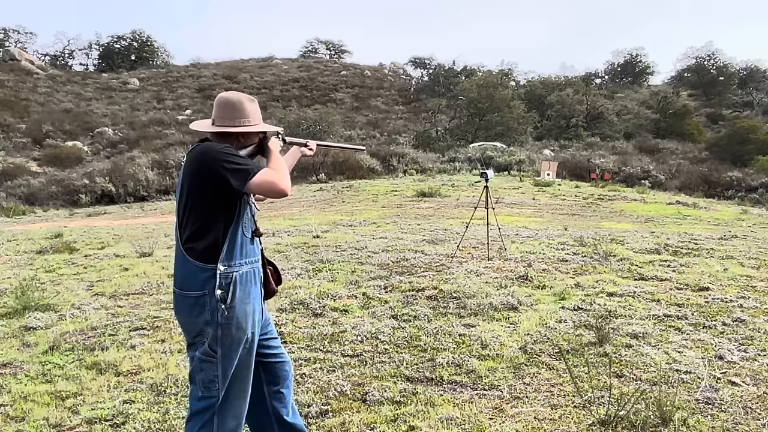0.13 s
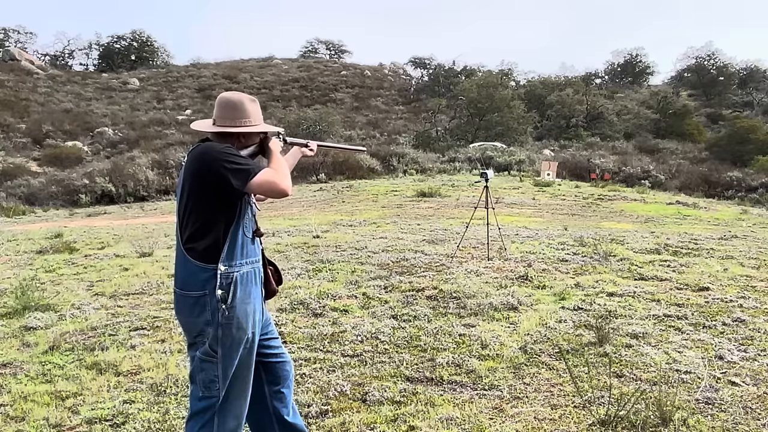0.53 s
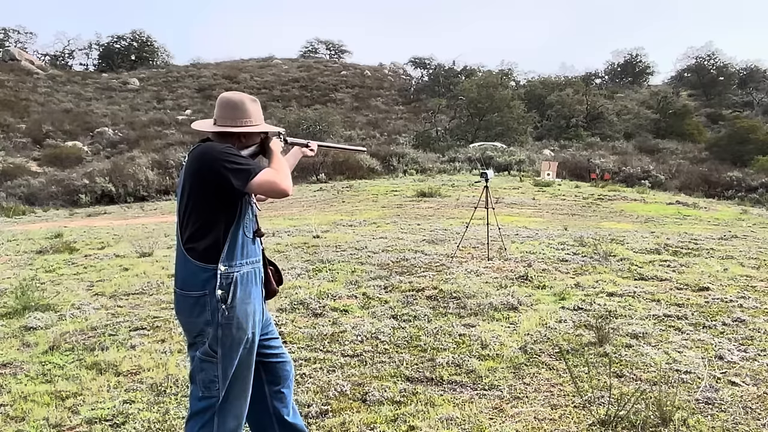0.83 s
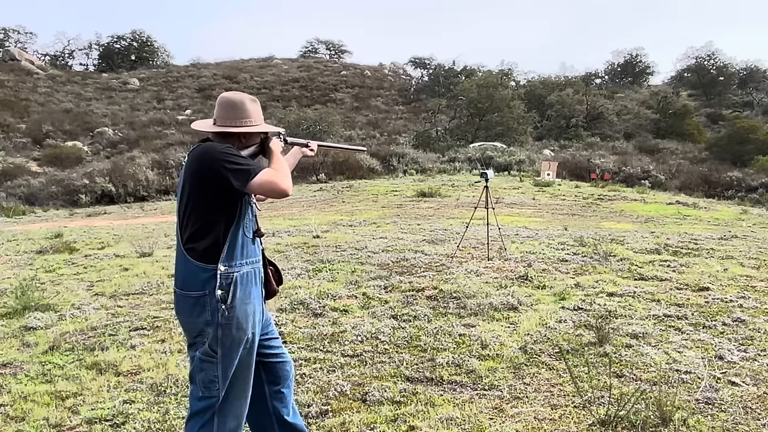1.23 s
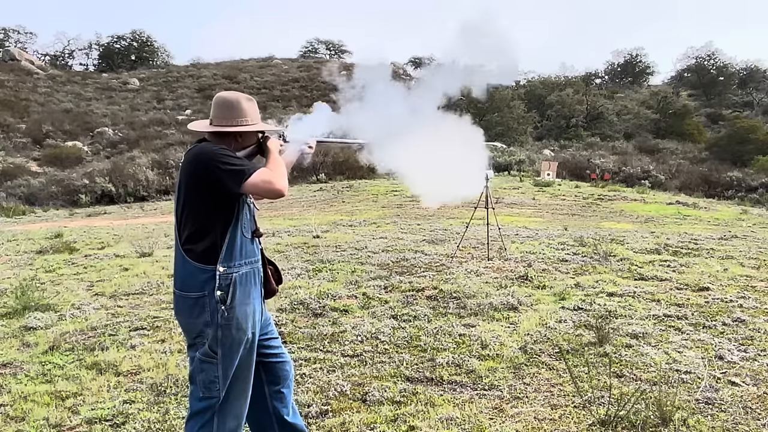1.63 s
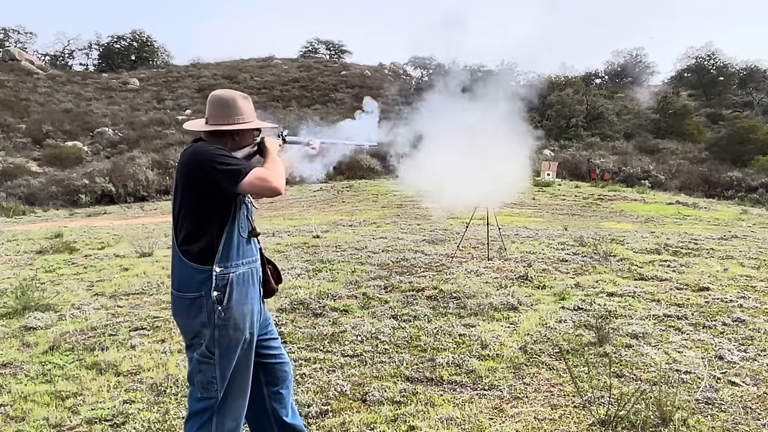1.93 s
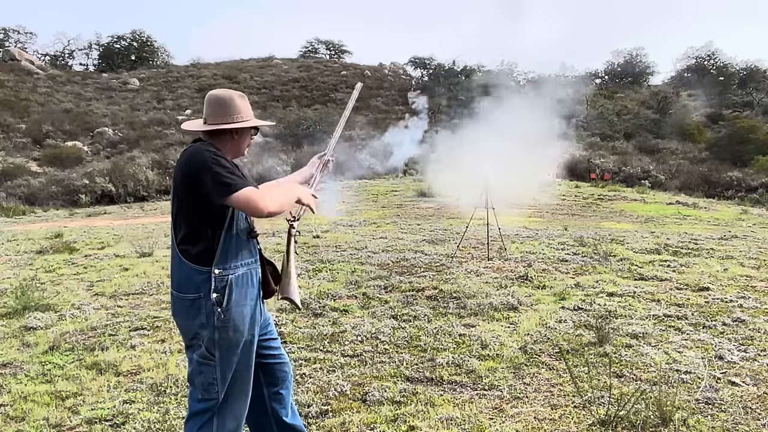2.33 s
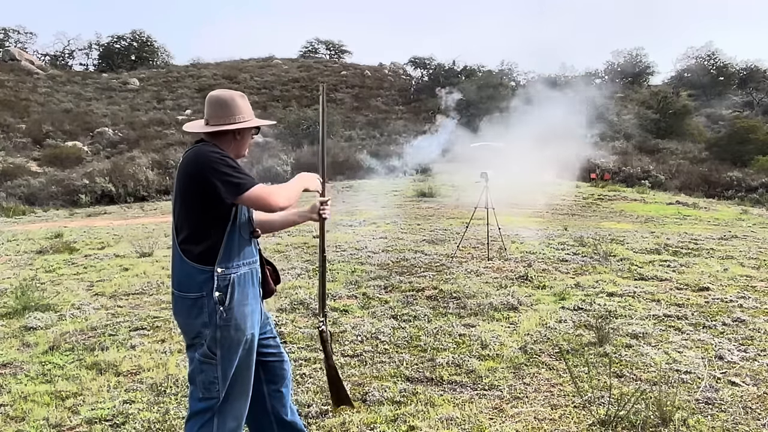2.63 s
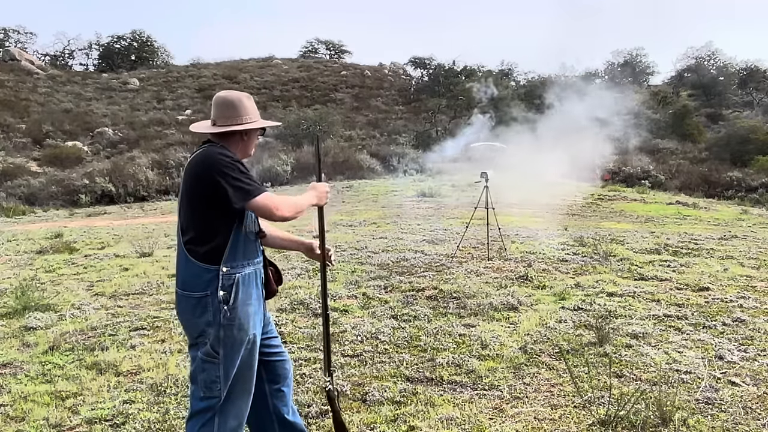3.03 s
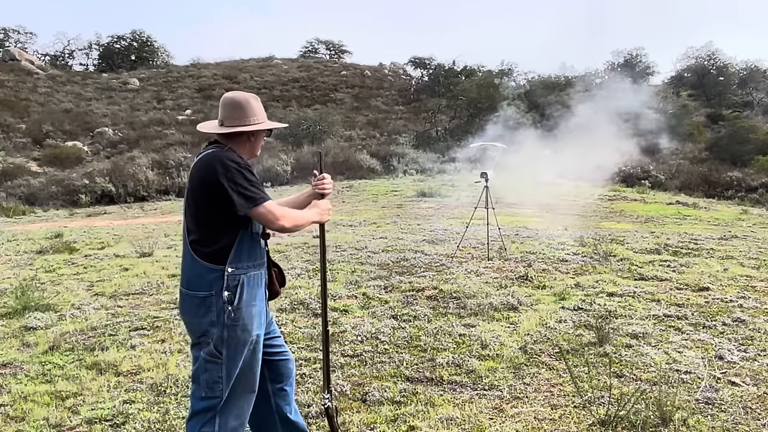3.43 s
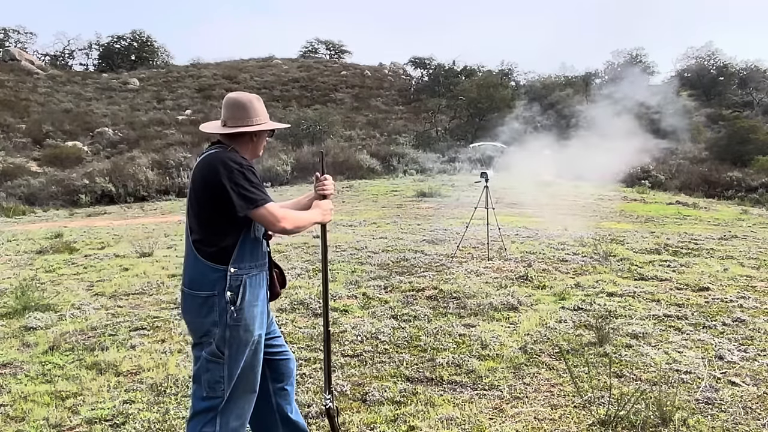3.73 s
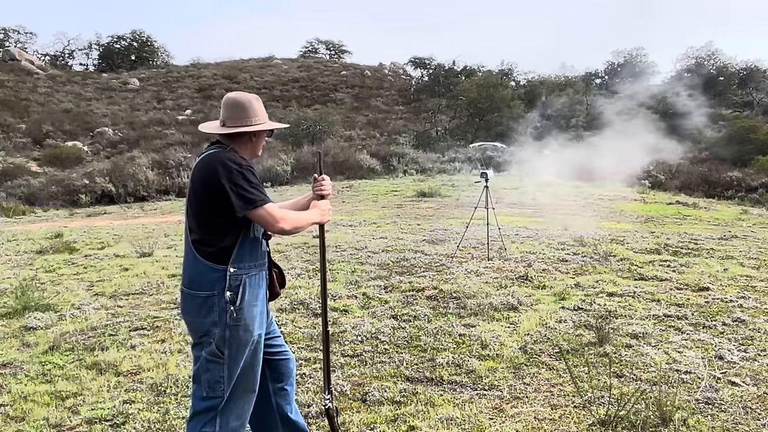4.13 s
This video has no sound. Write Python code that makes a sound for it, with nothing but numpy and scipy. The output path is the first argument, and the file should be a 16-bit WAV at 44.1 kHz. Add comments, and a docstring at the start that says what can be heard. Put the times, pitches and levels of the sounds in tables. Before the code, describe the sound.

An open grassy range among hills, heard through a stereo microphone close to a flintlock rifle. For the first 1.4 seconds it is very quiet: light wind puffs on the microphone, clothes rustle faintly and a far bird gives a few tiny pips. At 1.45 seconds the flint strikes with a quick clack and the priming fizzes briefly. At 1.54 the charge fires with one loud, sharp boom that overloads the microphone. Echoes slap back from the ground and slopes, the strongest at about 1.75, when a steel piece also rings downrange for under a second. The hillside echo rolls on with a low rumble, growing duller and fading by about 3 seconds. Faint ticks of kit and cloth rustles come from 2.8 onward, with one soft low thud and tick at 3.15. The eased wind continues faintly until about 4.3 seconds.

```python
"""An open grassy range ringed by scrubby hills, a stereo microphone close to a flintlock rifle.
Light wind puffs on the microphone, clothes rustle and a far bird pips. At 1.45 s the flint strikes and
the priming fizzes; at 1.54 s the charge booms and overloads the microphone. Slaps return from ground,
posts and slopes, a steel piece rings downrange, and the hillside echo rumbles away.
Kit ticks faintly in the easing wind, with one low thud at 3.15 s."""
import sys
import numpy as np
from scipy import signal
from scipy.fft import rfft, irfft, next_fast_len
from scipy.io import wavfile

SR = 44100
rng = np.random.default_rng(int(sys.argv[2]) if len(sys.argv) > 2 else 0)


def store_pcm(level_fs):
    """Save levels as 16-bit WAV."""
    pcm = np.round(np.clip(level_fs, -1, 1) * 32767).astype(np.int16)
    wavfile.write(sys.argv[1], SR, np.atleast_2d(pcm).T)


N = 189365
T = np.arange(N) / SR
SHOT_S = 1.54


def from_db(db):
    """Decibels to gain."""
    return 10 ** (np.asarray(db) / 20)


def rms_one(x):
    """Scale to unit rms."""
    return x / np.sqrt(np.mean(x ** 2) + 1e-20)


def in_time(rows):
    """Columns of a curve, sample by sample."""
    s, *columns = np.transpose(rows)
    return [np.interp(T, s, c) for c in columns]


def sounding(rows):
    """One while a curve lasts, with 5 ms edges."""
    return np.clip(np.minimum(T - rows[0][0], rows[-1][0] - T) / .005, 0, 1)


def at_hz(points, hz):
    """Value of a spectrum table on a log-frequency axis."""
    freqs, values = np.transpose(points)
    return np.interp(np.log(hz), np.log(freqs), values)


def swell(s, rise, fall):
    """Exponential rise to a crest at s, exponential fall after it; time constants in seconds."""
    return np.exp(np.where(T < s, (T - s) / rise, (s - T) / fall))


def wobble(per_s):
    """Random drift of spread about one, a new value per_s times a second."""
    knots = np.arange(0, T[-1] + 1, 1 / per_s)
    return np.interp(T, knots, rng.standard_normal(len(knots)))


def resonance(x, hz, width_hz):
    """Two-pole band-pass with gain 1 on top."""
    r = np.exp(-np.pi * width_hz / SR)
    gain = (1 - r * r) / 2
    return signal.lfilter([gain, 0, -gain], [1, -2 * r * np.cos(2 * np.pi * hz / SR), r * r], x + 1e-18)


def filtered(x, hz, kind="low", order=2):
    """Butterworth filter."""
    return signal.sosfilt(signal.butter(order, hz, kind, fs=SR, output="sos"), x)


def coloured(mid, side, spectrum, treble_db=0, low_hz=100):
    """Stereo mix of half-octave bands at unit rms, then tilted above 2 kHz by treble_db per 4 kHz."""
    # likeness of left and right at the microphone: f/Hz, correlation
    likeness = [(60, 0.99), (180, 0.99), (550, .65), (1650, 0.21), (4000, 0.88), (7000, 1), (15000, 1)]
    top_hz = min(spectrum[-1][0] * 1.2, 19000)
    edges = low_hz * 2 ** np.arange(0, np.log2(top_hz / low_hz), .5)
    out, power = 0, 0
    for k, (low, high) in enumerate(zip(edges, edges[1:])):
        hz = np.sqrt(low * high)
        m, s = filtered([mid[k % 2], side[k % 2]], [low, high], "band", order=3)
        alike = np.clip(at_hz(likeness, hz), 0, .995)
        stereo = np.sqrt(1 + alike) * m + np.sqrt(1 - alike) * s * [[1], [-1]]
        band = from_db(at_hz(spectrum, hz)) * stereo
        out = out + band * from_db(treble_db * np.clip((hz - 2000) / 4000, 0, 1.8))
        power += np.mean(band ** 2)
    return out / np.sqrt(power)


def noise(spectrum, **tone):
    """Stereo noise of a given colour."""
    return coloured(*rng.standard_normal((2, 2, N)), spectrum, **tone)


def far_ambience():
    """The faint hush of the open range, sinking towards the end."""
    # loudness of the distant air: t/s, level/dB
    levels = [(0, -72.5), (3.0, -72), (3.6, -77), (4.29, -80)]
    # its spectrum: f/Hz, density/dB
    colour = [(170, -4), (250, -1.5), (600, -9.5), (1200, -15.5), (2000, -22), (4000, -26), (7500, -29.5),
              (12500, -30.5), (15800, -45)]
    return from_db(in_time(levels)[0]) * noise(colour, low_hz=167.34)


def bird():
    """A far bird: short soft sine pips."""
    # pips: t/s, f/Hz, level/dB, half-length/s
    pips = [(0.567, 3200, -73.5, .006), (0.594, 3170, -70, 0.0053), (.617, 3220, -76, .006),
            (0.666, 3200, -77, 0.0074), (.99, 6700, -81.5, .018), (1.075, 6850, -84, .012),
            (1.16, 7200, -90, .012), (1.23, 7350, -88, .018)]
    return sum(from_db(db) * np.exp(-((T - s) / half) ** 2) * np.sin(2 * np.pi * hz * T)
               for s, hz, db, half in pips)


def wind_and_thud(level_db=-63, lumps_db=3.5, eases_at_s=2.8, eases_db=3.5):
    """A lumpy rumble of wind on the microphone, wind puffs, and one low thud at 3.15 s."""
    # wind puffs, and the thud at 3.15 s: t/s, level/dB
    bumps = [(.6, -58), (.77, -55.5), (.874, -67), (1.074, -54.5), (1.222, -50), (1.382, -54.5),
             (3.152, -53), (3.46, -62.5), (3.704, -64), (3.83, -58), (4.07, -58.5), (4.25, -57)]
    # spectrum of wind and thud: f/Hz, density/dB
    colour = [(12, -37), (20, -5.5), (37, -2), (56, 4.5), (107, -2), (193, -24.5), (400, -31), (520, -56),
              (880, -120)]
    breeze = from_db(level_db - eases_db * (T > eases_at_s) + lumps_db * wobble(12))
    surges = sum(from_db(db) * swell(s, rise=.022, fall=.035) for s, db in bumps)
    return (breeze + surges) * noise(colour, low_hz=29.6)


def clothes_and_kit():
    """Cloth rustles and kit ticks nearby: brief bands of noise, the ticks rising more sharply."""
    # rustles of cloth: t/s, level/dB, f/Hz, half-width/octaves, fall/s
    rustles = [(0.454, -65.5, 1770, .79, .02), (0.553, -73.5, 4500, 0.44, .016), (.6, -77, 3600, .24, .05),
               (0.876, -75.5, 2500, 1.4, .06), (1.041, -71, 2000, 1.17, 0.032),
               (1.1, -76, 4370, 0.56, 0.054), (2.9, -68, 12000, 0.5, 0.015), (3.152, -73, 6990, 1.44, .025),
               (3.345, -77, 3700, .21, 0.015), (4.12, -70.5, 650, .2, 0.021), (4.125, -77, 1700, .15, .016),
               (4.279, -71.5, 1197, .8, 0.016)]
    # ticks of kit: t/s, level/dB, f/Hz, half-width/octaves, fall/s
    ticks = [(2.778, -71, 4485, .9, .004), (2.899, -60, 4500, .8, .004), (3.135, -52.5, 6000, 3.5, 0.0094),
             (3.319, -67.5, 5020, 0.37, .007)]
    friction = rng.standard_normal(N) + 1.4 * rng.standard_normal((2, N))
    out = np.zeros((2, N))
    for events, rise_share in (rustles, 1), (ticks, .4):
        for s, db, hz, octaves, fall in events:
            edges = np.clip([hz / 2 ** octaves, hz * 2 ** octaves], 20, 18000)
            span = slice(round((s - .2) * SR), round((s + .3) * SR))
            band = rms_one(filtered(friction[:, span], edges, "band"))
            out[:, span] += from_db(db) * swell(s, rise_share * fall, fall)[span] * band
    return out


def hill_rumble(lumps_db=3):
    """The hills return the low end of the shot: a boom near 250 Hz over a rumble near 80 Hz."""
    # low echo: t/s, level/dB
    boom = [(1.585, -32.5), (1.67, -42), (1.70, -31), (1.75, -24.5), (1.82, -39), (1.92, -49.5),
            (2.16, -44), (2.42, -44.5), (2.5, -66), (2.8, -80)]
    # its spectrum: f/Hz, density/dB
    boom_colour = [(120, -8), (180, -3), (300, -2), (450, -7.5), (500, -14)]
    # deep echo: t/s, level/dB
    rumble = [(1.585, -16), (1.61, -46), (1.68, -44), (1.74, -39), (1.82, -43), (1.87, -34.5),
              (2.05, -32.5), (2.11, -39.5), (2.42, -44), (2.5, -53.5), (3.1, -75.5), (3.4, -96)]
    # its spectrum: f/Hz, density/dB
    rumble_colour = [(30, -13.5), (50, -7.5), (80, 6), (120, 1), (160, -8), (200, -15.5)]
    out = 0
    for curve, colour, low_hz in (boom, boom_colour, 118), (rumble, rumble_colour, 27.53):
        level = from_db(in_time(curve)[0] + lumps_db * wobble(18)) * sounding(curve)
        out = out + level * noise(colour, low_hz=low_hz)
    return out


def hill_scatter(grains_per_s=390, smooth_at_s=2.68, air_loss_db_per_s=42):
    """Countless small reflections from bush and rock, dulled by the air the farther they travel."""
    # hillside echo: t/s, level/dB
    echo = [(1.585, -42), (1.64, -38.5), (1.69, -31), (1.72, -38.5), (1.745, -29.5), (1.86, -27.5),
            (1.89, -38), (1.93, -25), (2.05, -32.5), (2.17, -27), (2.24, -32.5), (2.29, -29.5), (2.35, -38),
            (2.42, -35.5), (2.49, -40.5), (2.61, -50.5), (2.66, -38.5), (2.72, -56), (3.1, -67.5),
            (3.7, -91.5)]
    # its spectrum before the treble tilt: f/Hz, density/dB
    colour = [(300, -16.5), (450, -2.5), (700, 3), (1200, 5.5), (2000, -4), (3500, -3.5), (6000, -8),
              (8500, -12), (12000, -22), (15800, -33)]
    treble_db = np.maximum(14.5 - air_loss_db_per_s * (T - SHOT_S), -34)
    treble_db -= 15 * np.exp(-((T - 1.675) / .022) ** 2)   # the treble dulls briefly just after the shot
    sizes = from_db(4 * np.minimum(rng.exponential(1, N), 4)) * rng.choice([-1, 1], N)
    impulses = rms_one(sizes * (rng.random(N) < grains_per_s / SR))
    grains = 1.1 * swell(smooth_at_s, rise=9, fall=.03) * filtered(impulses, hz=2460)
    mid, side = rng.standard_normal((2, 2, N))
    scatter = coloured(mid + grains, side, colour, treble_db=treble_db, low_hz=283.5)
    return sounding(echo) * from_db(in_time(echo)[0]) * scatter


def downrange_steel(at_s=1.758, waver_db=2.5):
    """A struck steel piece rings in unrelated partials; each wavers as it crosses the moving air."""
    # partials of the steel: f/Hz
    partials = [1050, 2576, 4963, 8140, 11862, 13240]
    # envelope of each partial: level/dB, t60/s, rise/s
    envelopes = [(-28.5, .2, 0.022), (-27.5, 1, 0.006), (-29, 0.57, 0.0485), (-30.5, .4, 0.0046),
                 (-28, 0.26, .003), (-37.5, .16, .003)]
    since, out = np.maximum(T - at_s, 0), 0
    for hz, (db, t60, rise) in zip(partials, envelopes):
        level_db = db - 60 * since / t60 + waver_db * wobble(40)
        out = out + (1 - np.exp(-since / rise)) * from_db(level_db) * np.sin(2 * np.pi * hz * since)
    return out


def slaps():
    """Each reflector sends back one short wave and a smear of weaker ones from its rough surface."""
    # echoes off ground, posts and slopes: t/s, level/dB, left over right/dB, f/Hz, scatter gain/dB
    echoes = [(1.5572, -5, -3, 1510, 0), (1.5598, -1, -4, 1290, -8), (1.5725, -6, 6, 860, 3),
              (1.5745, -6, -3, 1080, -7), (1.5785, -5.5, -5, 2300, 1.5), (1.695, -24.5, -4, 3630, 4),
              (1.737, -26.5, 7, 1557, 12), (1.7495, -11, 2, 1129, 6), (1.7572, 3.5, -5, 1162, 0.5),
              (1.8378, -13, -1, 1820, 6), (1.8402, -10.5, -1, 1780, 1), (1.868, -19.5, -5, 1460, 5.5),
              (1.9133, -9.5, 2, 1550, -6), (1.929, -11, -3.5, 1190, 5.5), (1.939, -15, -7, 1380, -1),
              (1.970, -7.5, -3, 1220, -2), (1.978, -13, -2.5, 1320, 10), (2.0755, -11.5, -0.5, 1120, 1.5),
              (2.097, -15, -3.5, 1160, 0.5), (2.123, -14, -1, 1180, 5), (2.137, -22.5, -1.5, 1124, 11.5),
              (2.195, -21.5, -6, 926, 10), (2.2312, -16.5, 0.5, 1085, -4), (2.292, -20, -0.5, 810, 3.5),
              (2.307, -21, -0.5, 764, 3.5), (2.367, -19, -2.5, 840, 0.2), (2.41, -23, 4, 940, 5.5),
              (2.43, -26.5, 0.7, 910, 4.5), (2.478, -26.5, 4, 950, 5), (2.522, -30.5, 0, 854, 8),
              (2.672, -29, 1, 1040, 2.5)]
    rough = rng.standard_normal(N) + 1.1 * rng.standard_normal((2, N))
    out = np.zeros((2, N))
    for s, db, pan_db, hz, scatter_db in echoes:
        smear_s = .0022 + .005 * (s - SHOT_S)   # longer the farther it came
        span = slice(round((s - .06) * SR), round((s + .1) * SR))
        cycle = hz * (T[span] - s) - 1
        wave = -np.cos(2 * np.pi * cycle) * np.exp(-(cycle / .58) ** 2)
        band = resonance(rough[:, span], hz, .73 * hz)
        dulled = filtered(resonance(band, .57 * hz, 1.2 * hz), 4 * hz)   # the air takes the top off
        scatter = dulled * swell(s + .0018, smear_s / 2, smear_s)[span]
        pan = from_db([[pan_db / 2], [-pan_db / 2]])
        out[:, span] += from_db(db) * pan * (wave + from_db(scatter_db) * scatter)
    return out


def lock():
    """Each knock of the lock is a few milliseconds of scraping that rings wood and steel."""
    # lock parts knocking: t/s, drive/dB, extra drive of the frizzen/dB
    knocks = [(1.4455, -28.5, 12), (1.4518, -9.5, 1.5), (1.4568, 1, -3.5), (1.4605, -10, 3),
              (1.4645, -5.5, -4.5), (1.4698, -13.5, -5), (1.472, -18, 2), (1.4825, -30, 3.5),
              (1.4848, -15.5, 3), (1.494, -16.5, -3), (1.5025, -17.5, 0), (1.508, -18.5, -1)]
    # resonances of stock and cock: f/Hz, width/Hz, gain/dB
    body_modes = [(1270, 490, 6), (1700, 450, -0.1), (2490, 500, -5.5), (3075, 50.3, 2), (5450, 1100, -13)]
    # resonances of the steel frizzen: f/Hz, width/Hz, gain/dB
    frizzen_modes = [(7600, 2700, 0), (9150, 1800, -2.5), (12600, 1800, -3), (14090, 1200, -3.5)]
    scrape, wood, steel = rng.standard_normal(N), 0, 0
    for s, db, bright_db in knocks:
        contact = from_db(db) * (T > s) * scrape
        wood = wood + swell(s + .0017, .0006, .0017) * contact
        steel = steel + from_db(bright_db) * swell(s + .00094, .00056, .0012) * contact
    return (sum(from_db(db) * resonance(wood, hz, width) for hz, width, db in body_modes)
            + sum(from_db(db) * resonance(steel, hz, width) for hz, width, db in frizzen_modes))


def priming(lit_s=1.4445, out_s=1.535, sag_db_per_s=90, out_db_per_s=600, sputter_db=2.5):
    """The priming flares, sputters as it burns down and goes out as the charge fires."""
    # spectrum of the fizz: f/Hz, density/dB
    colour = [(150, -16), (700, -7.5), (1570, -7), (3040, -7.5), (4220, -21), (6000, -13), (8000, -11),
              (11500, -12), (14000, -16.5), (15800, -25)]
    since = np.maximum(T - lit_s, 0)
    flare = 1 - np.exp(-since / .012)
    burn_db = -23.5 - sag_db_per_s * since - out_db_per_s * np.maximum(T - out_s, 0)
    return flare * from_db(burn_db + sputter_db * wobble(300)) * noise(colour)


def muzzle_blast():
    """Gas leaves the barrel: slow pressure swings under the roar of the jet."""
    # pressure swings: t/s, f/Hz, level/dB, rise/s, fall/s, lag of the right side/s
    swings = [(1.5381, 289.9, -7, 0.0013, .002, .0003), (1.544, 349.6, 5.5, .0018, .0025, .0001),
              (1.554, 430, 0, .002, 0.004, .0001), (1.5613, 76.2, -8, 0.012, .022, .002),
              (1.5722, 520, -8.5, 0.0033, 0.0017, .0006), (1.7642, 190, -17.5, 0.005, 0.0057, .0002)]
    # bursts of the jet: t/s, level/dB, treble tilt/dB, fall/s
    bursts = [(1.533, -19.5, -10, 0.036), (1.5498, -8, 9.5, 0.0057), (1.558, -5.5, 2, 0.01),
              (1.572, -8, -3, 0.0065), (1.581, -7.5, 2, .006), (1.6, -22.5, -4.5, 0.041)]
    # spectrum of the jet before the tilt: f/Hz, density/dB
    colour = [(120, -6.5), (500, -10), (830, -13), (1600, -16.5), (2750, -16.5), (5000, -20.5), (8000, -27),
              (12000, -26.5), (15800, -34.5)]
    pressure = 0
    for s, hz, db, rise, fall, lag in swings:
        phase = 2 * np.pi * hz * (T - s - np.array([[0], [lag]]))
        pressure = pressure + from_db(db) * swell(s, rise, fall) * np.cos(phase)
    jet = np.max([from_db(db) * swell(s, .002, fall) for s, db, _, fall in bursts], axis=0)
    return pressure + jet * noise(colour, treble_db=in_time(bursts)[1])


def scene():
    """Rifle, answering range and background as they reach the microphone."""
    rifle = lock() + priming() + muzzle_blast()
    returns = slaps() + downrange_steel() + hill_scatter() + hill_rumble()
    background = wind_and_thud() + far_ambience() + clothes_and_kit() + bird()
    return rifle + returns + background


def record(dry, cutoff_hz=16400):
    """The two microphone ports turn the phase opposite ways; loud swings overload; the top is cut."""
    # phase between the ports: f/Hz, lead of the left/rad
    port_phase = [(0, 1), (130, -0.46), (400, -0.62), (1500, -1.13), (2550, 0), (3400, 1.21), (4400, 1.26),
                  (5400, -1.92), (7250, 0), (8700, -2.1), (10100, -2), (11500, -4.5), (12900, -6.5),
                  (14400, -8), (15600, -9)]
    size = next_fast_len(N + 4096)
    lead = np.interp(np.fft.rfftfreq(size, 1 / SR), *np.transpose(port_phase))
    ported = irfft(rfft(dry, size) * np.exp(.5j * lead * [[1], [-1]]), size)[:, :N]
    clipped = ported / (1 + ported ** 6) ** (1 / 6)   # soft limit at full scale
    top_cut = signal.cheby2(12, 60, cutoff_hz, fs=SR, output="sos")
    return np.clip(signal.sosfilt(top_cut, clipped), -1, 1)


dry = scene()
out = record(dry)
store_pcm(out)
```